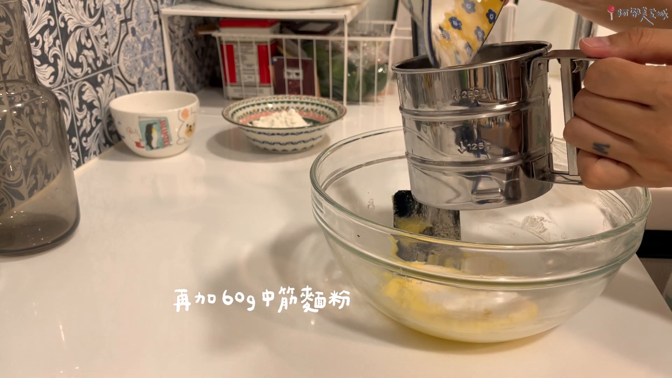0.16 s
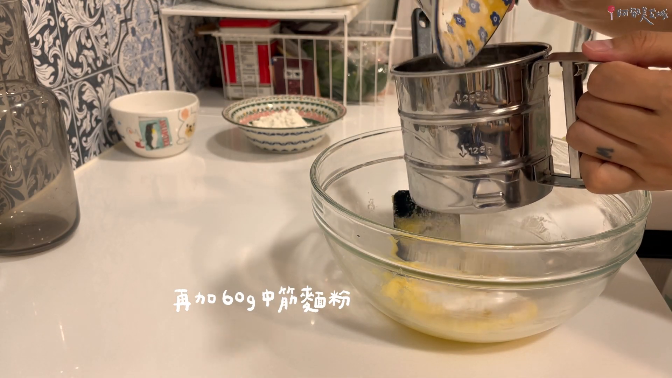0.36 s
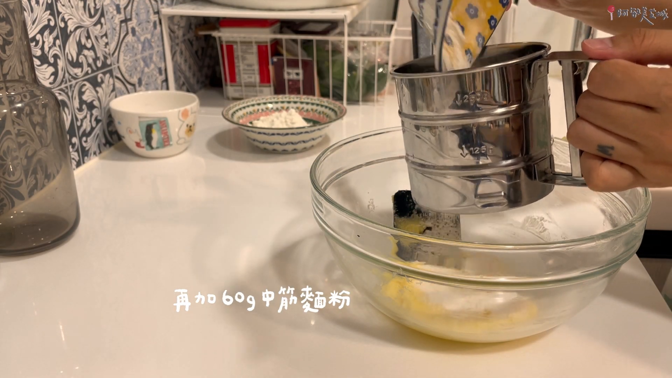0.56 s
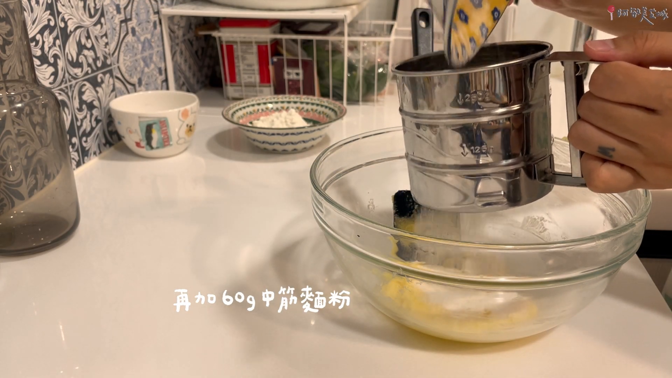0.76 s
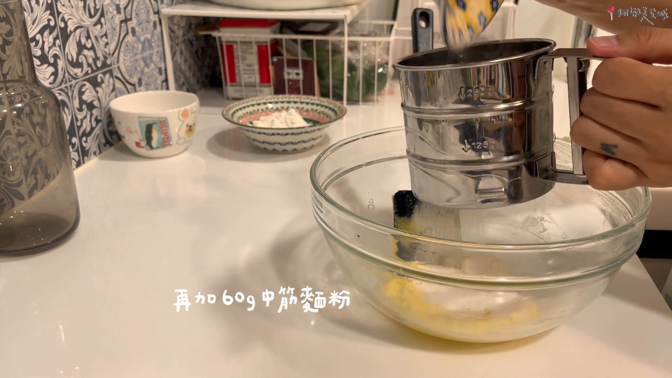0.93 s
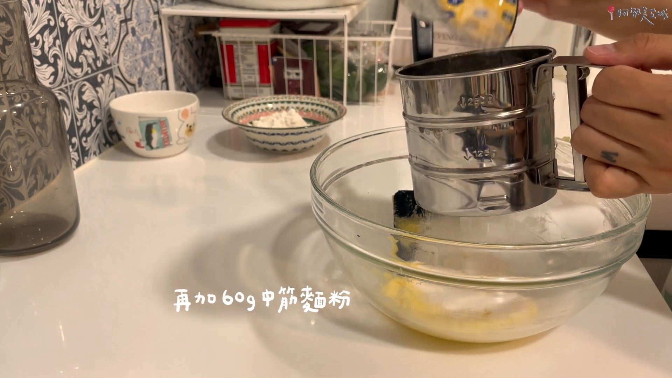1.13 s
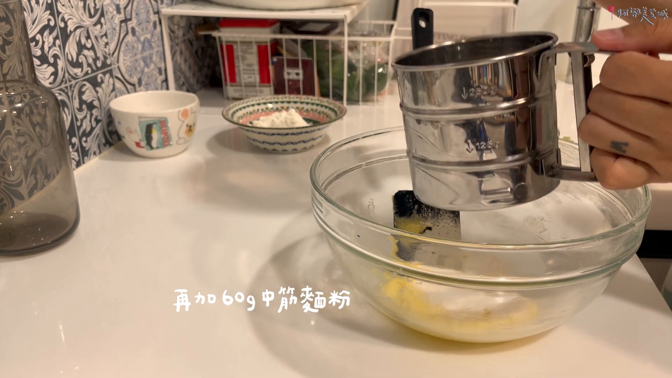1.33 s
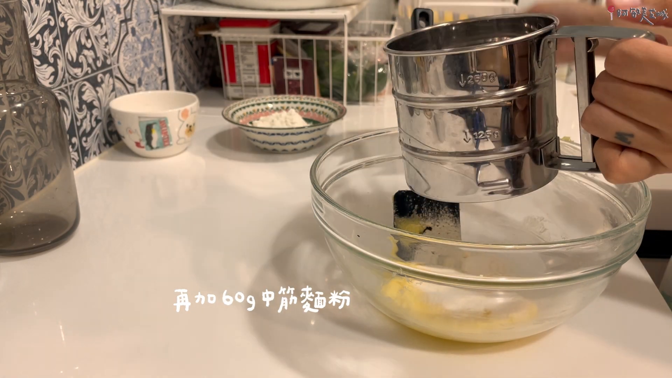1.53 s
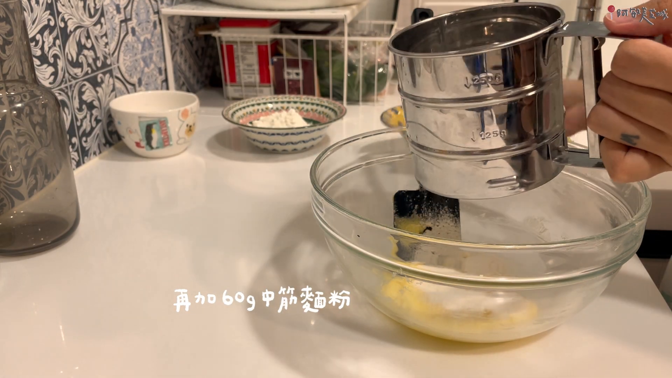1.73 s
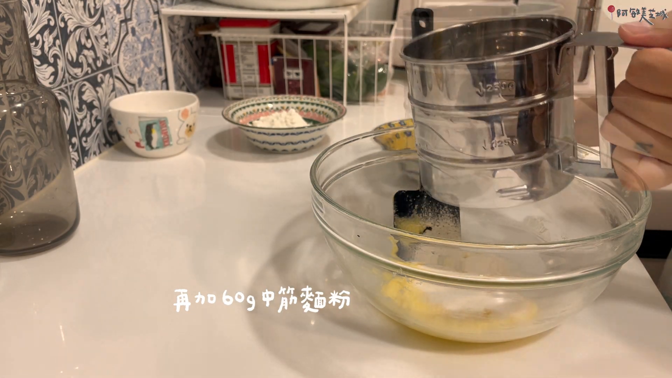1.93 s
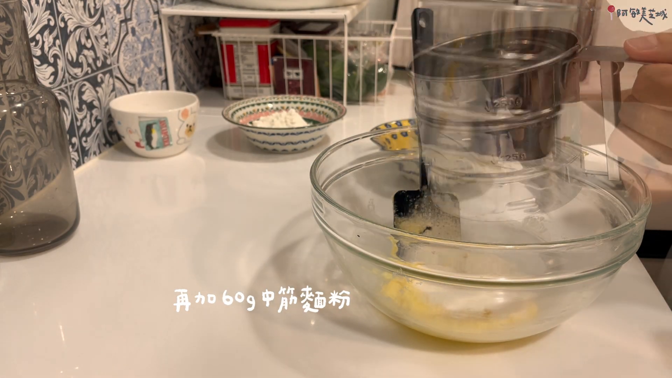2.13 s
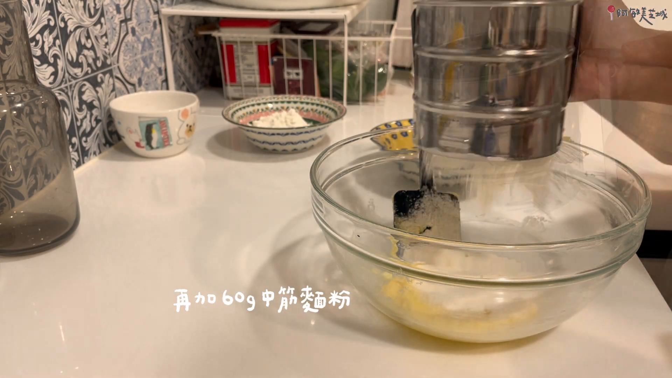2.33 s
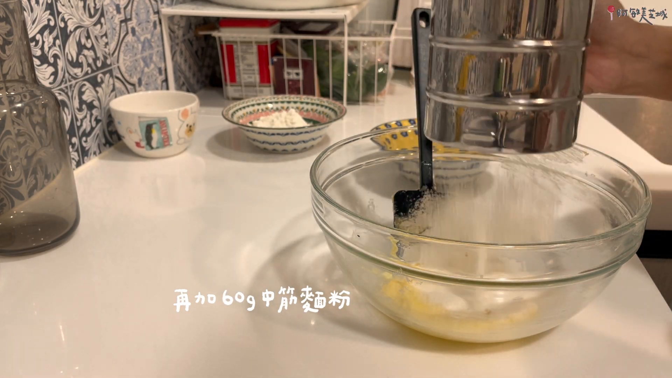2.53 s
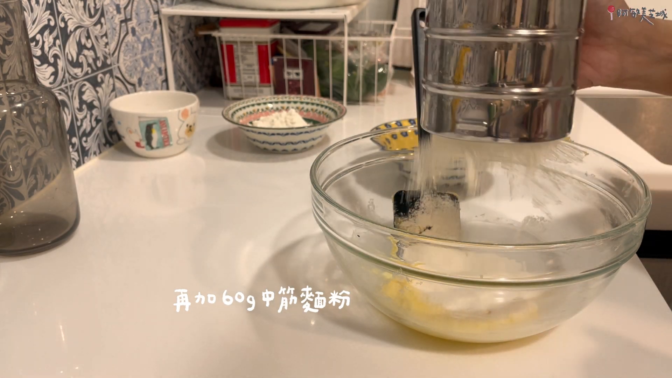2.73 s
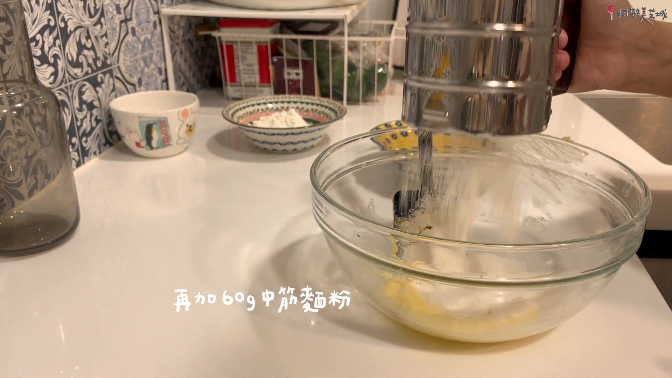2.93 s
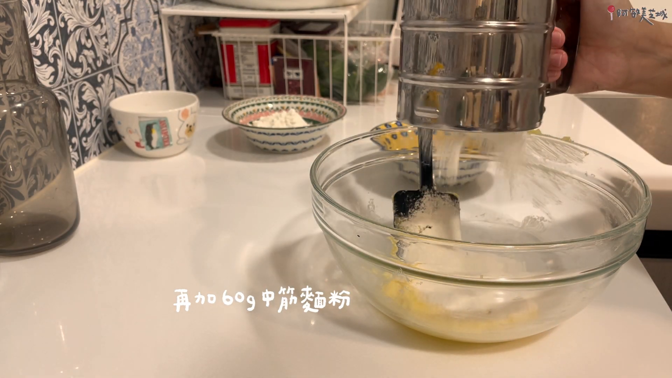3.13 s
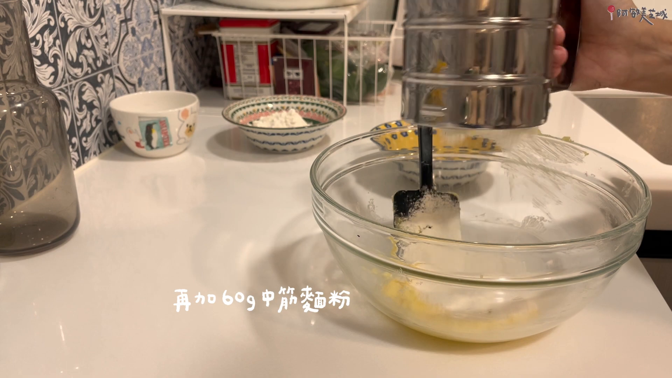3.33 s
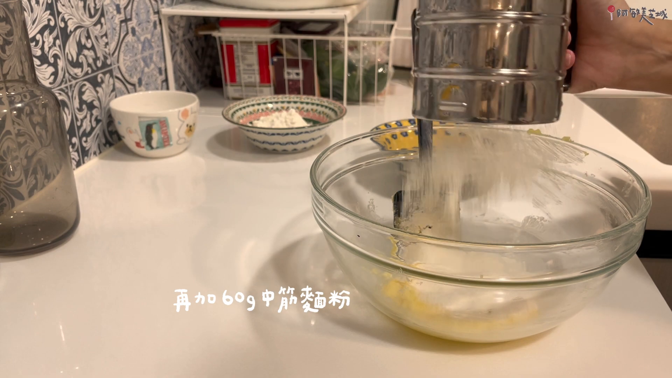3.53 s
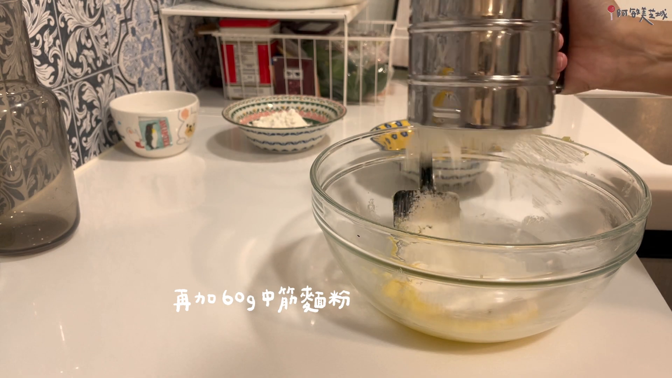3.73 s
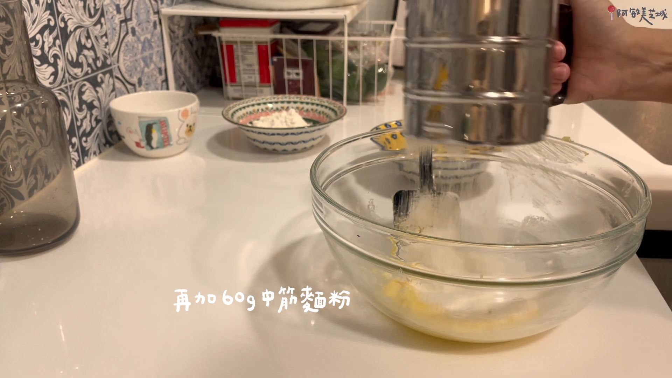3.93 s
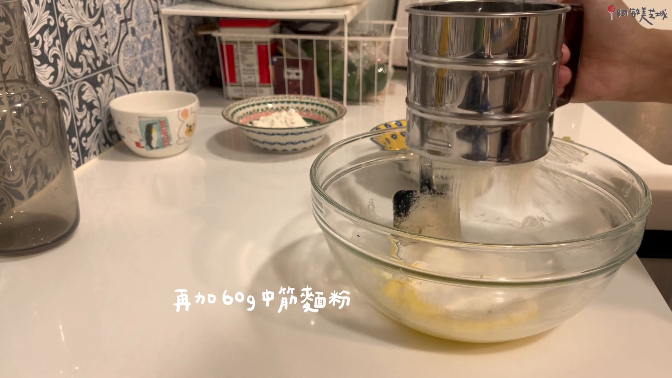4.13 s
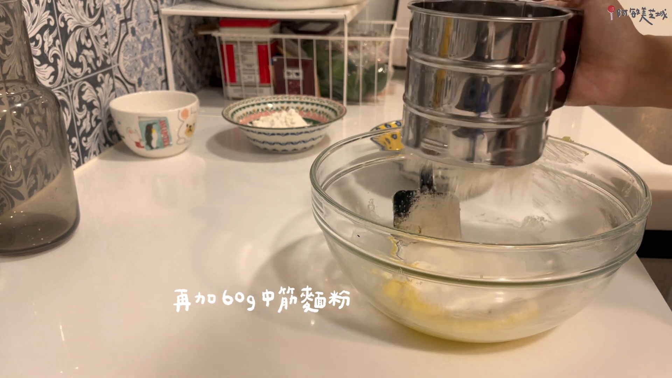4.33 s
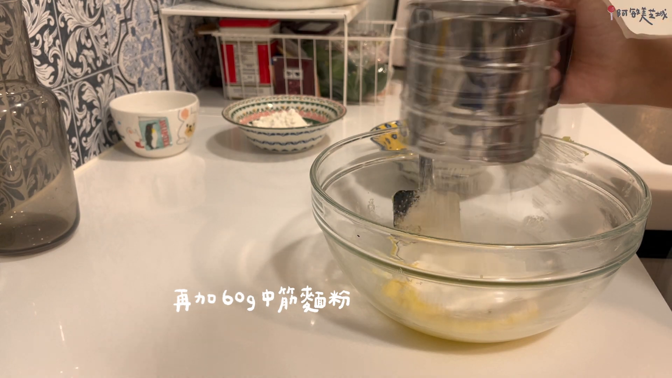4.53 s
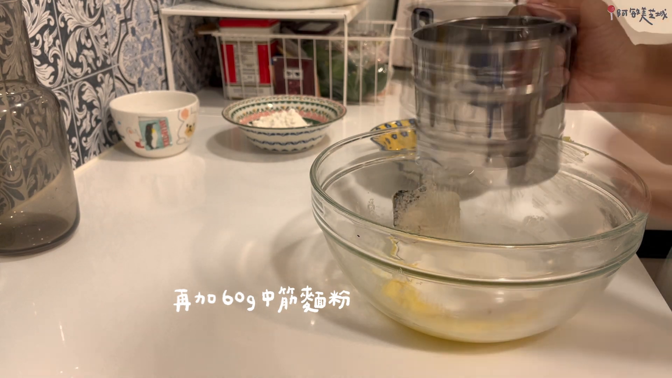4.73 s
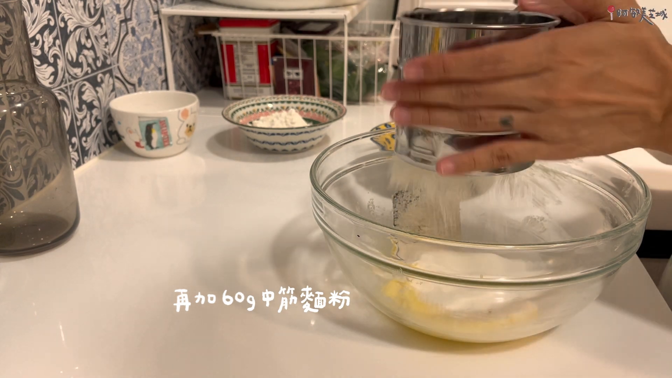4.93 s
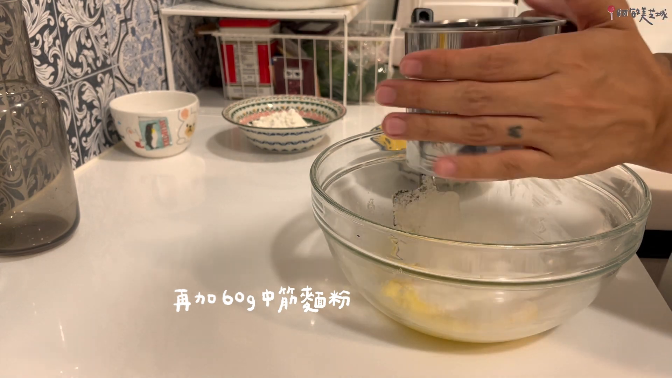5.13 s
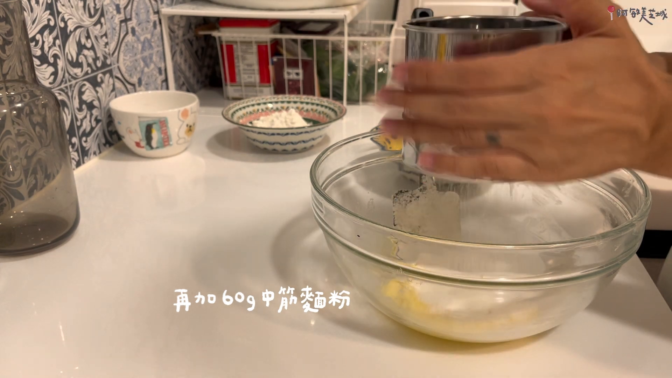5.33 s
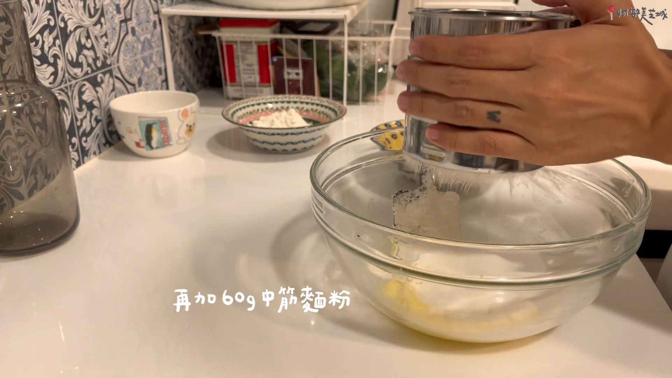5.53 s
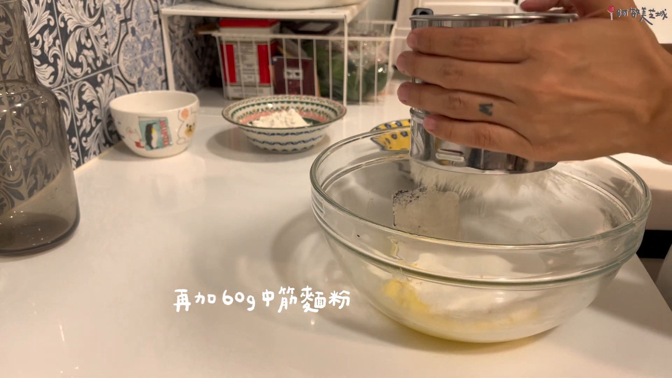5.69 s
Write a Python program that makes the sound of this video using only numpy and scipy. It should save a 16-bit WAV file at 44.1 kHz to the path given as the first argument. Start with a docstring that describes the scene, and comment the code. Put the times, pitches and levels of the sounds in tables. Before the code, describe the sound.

A small dish raps sharply on a steel flour sifter, the can knocks a glass bowl, then rhythmic squeezes rasp and palm slaps rattle it.

```python
"""A small ceramic dish taps the rim of a steel flour sifter: ringing modes, a noise crack and a dull thud.
The can knocks on a glass bowl; wires sweep the mesh as dense clicks that hiss and drive hollow notes;
thin steel ticks, flour trickles, and a palm slaps the can with a sinking thump and a rattle of wires.
Place: a hard-walled kitchen with broad noise and a low wavering hum. Distance: close.
Microphone: two ports, softly overloading on loud taps, with echoes made of decaying noise."""
import sys
import numpy as np
from scipy import signal
from scipy.fft import rfft, irfft, next_fast_len
from scipy.io import wavfile

SR = 44100
rng = np.random.default_rng(int(sys.argv[2]) if len(sys.argv) > 2 else 0)


def to_wav(s):
    """Save 16-bit WAV."""
    ch = np.atleast_2d(s).T  # columns
    pcm = np.round(np.clip(ch, -1, 1) * 32767)  # PCM
    wavfile.write(sys.argv[1], SR, pcm.astype(np.int16))


N = 254016
LEAD = 4410   # samples computed ahead of the start, so that earlier sound can ring into it
M = next_fast_len(N + LEAD)
TIME = (np.arange(M) - LEAD) / SR


def amp(db):
    """Decibels to a linear factor."""
    return 10 ** (np.asarray(db) / 20)


def rms_one(x):
    """Scales x to rms 1."""
    return x / np.sqrt(np.mean(x ** 2) + 1e-20)


def peak_one(x):
    """Scales x to peak 1."""
    return x / np.abs(x).max()


def at_hz(points, hz):
    """Reads a (Hz, value) curve along log frequency."""
    points = np.array(points)
    return np.interp(np.log(hz + 1), np.log(points[:, 0] + 1), points[:, 1])


def coloured(x, spectrum):
    """Gives white x a spectrum; rms 1."""
    hz = np.fft.rfftfreq(x.shape[-1], 1 / SR)
    return rms_one(irfft(rfft(x) * amp(at_hz(spectrum, hz)), x.shape[-1]))


def clicks(times, sizes):
    """Single-sample impulses at the given seconds."""
    out = np.full(M, 1e-18)   # a trace above zero keeps the filters fast
    np.add.at(out, np.round(np.asarray(times) * SR).astype(int) + LEAD, sizes)
    return out


def ring(x, hz, t60):
    """A damped resonance: a unit click sets a sine of height 1 ringing."""
    radius, w = amp(-60 / (t60 * SR)), 2 * np.pi * hz / SR
    return signal.lfilter([0, np.sin(w)], [1, -2 * radius * np.cos(w), radius ** 2], x)


def dying(times, levels_db, t60):
    """An envelope that jumps at each time and falls 60 dB in t60."""
    return signal.lfilter([1], [1, -amp(-60 / (t60 * SR))], clicks(times, amp(levels_db)))


def struck(times, levels_db, modes, spread_db):
    """Every blow strikes every mode with a random strength of its own."""
    draw = rng.standard_normal((len(times), len(modes)))
    total = 0
    for k, (hz, db, t60) in enumerate(modes):
        blows = clicks(times, amp(levels_db + db + spread_db * draw[:, k]))
        total = total + ring(blows, hz, t60)
    return total


def grit(per_s, spread_db):
    """Random clicks of uneven size and either sign; rms 1."""
    sizes = amp(spread_db * np.minimum(rng.exponential(1, M), 4)) * rng.choice([-1, 1], M)
    return rms_one(sizes * (rng.random(M) < per_s / SR))


def lumps(per_s, depth_db):
    """A gain that wanders between random levels, drawn at the given rate."""
    knots = rng.standard_normal(int(M / SR * 400))
    place = np.arange(M) / SR * min(per_s, 390)
    return amp(depth_db * np.interp(place, np.arange(len(knots)), knots))


# Dish on rim, close to the ports, one row a touch of a bouncing tap. Each row: start in seconds, level in dB,
# extra on the modes under 2.4 kHz in dB, extra on those from 4.5 kHz up in dB.
TAP_TOUCHES = [(-.045, -1, -9, -2), (0.132, -18, 8, 4), (0.2601, 3, 5, -1), (0.2644, -4, -2, 0),
               (0.271, -13.5, 2, -0.5), (0.3963, 0, 1.5, -4), (0.402, 1, -23, -4.5), (0.406, -4.5, 1.5, -1),
               (.541, -3, 9, -1), (.546, 1.5, -1.5, -1), (0.6896, -0.5, 9, -5.5), (.694, 0, -18, -1),
               (.866, 2, 3.5, -3.5), (0.869, -6, -5, -2.5), (.884, -20, 10, 2), (1.054, 3, -7, -1.5),
               (1.061, -10, 7, 7), (1.064, 1, -17.5, 4.5)]
# Dish and rim ringing together. Each row: frequency in Hz, relative level in dB, t60 in seconds.
DISH_MODES = [(622, -18.5, 0.055), (875, -19, 0.12), (1410, -22, 0.059), (1644, -15.5, 0.057),
              (2007, -6, 0.021), (2890, -4, 0.03), (2710, -21, 0.028), (2974, -2, 0.047), (3075, -7, .03),
              (3085, 5, 0.033), (3166, 5, 0.045), (3130, -8, 0.027), (3400, -14, 0.03), (3880, -20, .03),
              (4660, -8, 0.023), (4940, -13.5, .03), (5120, 2.5, 0.026), (5135, -30, .15), (5160, -26, .12),
              (5208, -24, .15), (5250, -18, .2), (5300, -28, .1), (5920, -12.5, 0.027), (6457, -9.5, 0.041),
              (7080, -19.5, 0.025), (7260, -10.5, 0.0062), (10050, -30, 0.071), (15700, -4.5, 0.024)]
# Colour of the crack. Each row: frequency in Hz, relative level in dB per Hz.
TAP_CRACK_COLOUR = [(60, -45), (300, -24), (800, -25.5), (1600, -4.5), (2400, -11), (3100, -2.5),
                    (4000, -10.5), (6500, -11.5), (10000, -15), (13000, -22.5), (15000, -16)]
# parts of a tap against its level, dB
TAP_CRACK_DB, TAP_RING_DB, TAP_TOP_DB, THUD_DB, THUD_HIGH_DB = -2.5, -13, -10.5, -29.5, -21
DISH_FLUTTER_DB = 2   # flour and grip keep shaking the ring


def taps():
    """Modes, a broad crack and a dull thud of the can; where the dish lands tips the balance of its modes."""
    s, level_db, low_db, top_db = np.transpose(TAP_TOUCHES)
    crack = coloured(rng.standard_normal(M), TAP_CRACK_COLOUR)
    crack = crack * dying(s, level_db + TAP_CRACK_DB, t60=0.022)
    thud = ring(clicks(s, amp(level_db + THUD_DB)), 150, 0.032)
    thud = thud + ring(clicks(s, amp(level_db + THUD_HIGH_DB)), 489, 0.031)
    low_modes = [m for m in DISH_MODES if m[0] < 2400]
    main_modes = [m for m in DISH_MODES if 2400 <= m[0] < 4500]
    top_modes = [m for m in DISH_MODES if m[0] >= 4500]
    low = struck(s, level_db + TAP_RING_DB + low_db, low_modes, spread_db=2.5)
    main = struck(s, level_db + TAP_RING_DB, main_modes, spread_db=2.0)
    top = struck(s, level_db + TAP_TOP_DB + top_db, top_modes, spread_db=2.5)
    return low + (main + top) * lumps(120, DISH_FLUTTER_DB) + crack + thud


# Can on glass bowl. Each row: start in seconds, level in dB, crisp edge in dB.
BOWL_KNOCKS = [(1.889, -3.5, -20), (1.918, -22, -22), (2.0286, -11.5, -11.5)]
# Glass bowl and can wall. Each row: frequency in Hz, relative level in dB, t60 in seconds.
BOWL_MODES = [(330, -10, .07), (470, -16, .04), (996, -19, .05), (1093, -15, .06), (1389, -6, .025),
              (1642, -4, .02), (1841, -8, .025), (2000, 8, .005), (2186, -6, .012), (2800, 1, .005),
              (2955, -8, .02), (3865, -10, .015), (5426, -29, .22), (5500, -33, .12)]
# Colour of the blunt contact. Each row: frequency in Hz, relative level in dB per Hz.
KNOCK_COLOUR = [(50, -54), (150, -14), (400, -12), (1000, -2.5), (2000, -0.5), (3500, -15), (6000, -31),
                (14000, -58)]
# Colour of the can juddering on the glass. Each row: frequency in Hz, relative level in dB per Hz.
SKID_COLOUR = [(100, -30), (300, -5), (550, 8), (1000, -12), (1600, 8.5), (2200, -10), (3000, -4),
               (4500, -25), (9000, -44), (14000, -52)]
KNOCK_CRACK_DB, KNOCK_RING_DB, SKID_DB = -2.5, -5.5, -22.5   # against the level of the knock
KNOCK_CRACK_T60_S, SKID_T60_S = 0.034, 0.37


def knocks():
    """Steel against thick glass: a blunt contact, dull, with thin long rings and a judder after it."""
    s, level_db, edge_db = np.transpose(BOWL_KNOCKS)
    edge = ring(clicks(s + 0.0008, amp(edge_db)), 2350, 0.007)
    crack = coloured(rng.standard_normal(M), KNOCK_COLOUR)
    crack = crack * dying(s + 0.00096, level_db + KNOCK_CRACK_DB, KNOCK_CRACK_T60_S)
    rings = struck(s + .0006, level_db + KNOCK_RING_DB, BOWL_MODES, spread_db=2.0)
    swell = np.minimum(1, 1.02 - dying(s + .0006, 0 * s, t60=.0025))   # the blow takes a moment to build
    skid = coloured(grit(1500, spread_db=2.0), SKID_COLOUR)
    skid = skid * dying(s + 0.0029, level_db + SKID_DB, SKID_T60_S)
    return rings * swell + crack + skid + edge


# Wires sweeping the mesh, hard as the trigger is squeezed, softer as it is let go. Each row: start in seconds,
# level in dB, swell in seconds, length in seconds, air in the can in Hz, its level in dB, wall note in dB.
SWEEPS = [(2.098, -23.5, 0.036, 0.028, 800, -51, -32), (2.267, -37, 0.024, 0.054, 600, -32.5, -27.5),
          (2.394, -25, 0.012, 0.041, 749, -24.5, -50), (2.544, -33.5, 0.028, 0.05, 635, -29.5, -29),
          (2.6563, -28.5, .01, 0.053, 778, -23, -48), (2.808, -33, 0.02, 0.043, 652, -33, -37),
          (2.921, -28, 0.0062, 0.03, 787.5, -17.5, -55), (3.065, -35.5, 0.015, 0.019, 921, -30.5, -50),
          (3.173, -18, 0.0068, 0.0046, 850, -37, -19.5), (3.305, -35.5, 0.019, 0.05, 785, -32, -33.5),
          (3.4205, -22.5, 0.01, 0.028, 792, -19.5, -26.5), (3.564, -32.5, 0.015, 0.029, 650, -30.5, -46),
          (3.678, -24, 0.0094, 0.027, 786, -24, -34), (3.811, -31, 0.009, 0.028, 672, -30.5, -33),
          (3.915, -21.5, 0.0066, 0.023, 807, -20, -39), (4.062, -31.5, 0.0091, 0.027, 697, -28, -29),
          (4.149, -15, 0.014, 0.0093, 848, -19, -16), (4.278, -27.5, 0.0094, 0.027, 838, -22.5, -26),
          (4.373, -16, 0.013, 0.015, 900, -39, -26), (4.493, -32, 0.016, 0.042, 753, -42, -28.5),
          (4.573, -30, 0.017, 0.019, 573, -42, -44), (4.871, -40, 0.012, 0.031, 756, -41, -51)]
# Colour of wires or flour on the mesh. Each row: frequency in Hz, relative level in dB per Hz.
MESH_COLOUR = [(150, -56.5), (400, -18), (650, -9), (1000, -6.5), (1400, -7), (2500, -8), (3400, -4),
               (3700, -9.5), (4400, -10), (5600, -15.5), (6600, -16.5), (8000, -15), (11000, -19),
               (15500, -30.5)]
# Steel can under the wires. Each row: frequency in Hz, level in dB, t60 in seconds.
CAN_MODES = [(802, -45.5, 0.28), (867, -46, 0.12), (1150, -41, 0.032), (1804, -38, 0.042),
             (2510, -46, 0.0092), (3270, -65, .02), (3400, -61.5, 0.016), (3810, -69, 0.023),
             (4490, -46, 0.037), (5020, -53, 0.029)]
STROKE_T60_S, STROKE_SAG_DB_PER_S = 0.1, 82   # fall after the length; sag added after the swell
SWELL_DB, CATCH_S = 12.5, 0.0025   # a stroke catches, then swells this much
NOTE_ROUGH_DB = -20   # wire clicks driving the notes, against the shove of the stroke
NOTE_LAG_S, NOTE_SWELL_S = 0.00804, 0.0078   # the hollow notes build a little after the hiss
WALL_HZ, WALL_T60_S, AIR_T60_S = 1003, .065, .1
NOTE_FLUTTER_DB = 3   # flour, wires and grip keep shaking the rings


def strokes():
    """Dense wire clicks under each stroke hiss on the mesh; the shove rings the can wall and the air inside it."""
    wires = grit(5000, spread_db=3.5) * lumps(170, depth_db=4.0)   # the wires catch in clumps
    push, notes, lag = np.full(M, 1e-18), np.zeros(M), round(NOTE_LAG_S * SR)
    for s, level_db, swell, length, air_hz, air_db, wall_db in SWEEPS:
        part = slice(round(s * SR) + LEAD, round((s + .3) * SR) + LEAD)
        t = TIME[part] - TIME[part.start]
        fall_db = -60 * np.clip(t - length, 0, 1) / STROKE_T60_S
        fall_db = fall_db - STROKE_SAG_DB_PER_S * np.clip(t - swell, 0, 1)
        rise_db = -SWELL_DB * np.clip(1 - t / max(swell, .001), 0, 1)
        shape = np.clip(t / CATCH_S, 0, 1) * amp(fall_db + rise_db)
        push[part] += amp(level_db) * shape
        shove = (t == 0) + amp(NOTE_ROUGH_DB) * wires[part] * shape + 1e-18
        air_note = amp(air_db) * peak_one(ring(shove, air_hz, AIR_T60_S))
        wall_note = amp(wall_db) * peak_one(ring(shove, WALL_HZ, WALL_T60_S))
        late = slice(part.start + lag, part.stop + lag)
        notes[late] += (air_note + wall_note) * np.clip(t / NOTE_SWELL_S, 0, 1)
    wall = 0
    for k, (hz, db, t60) in enumerate(CAN_MODES):
        drive = wires * push * lumps(11, depth_db=9.5)
        wall = wall + (-1) ** k * amp(db) * ring(drive, hz, t60)
    hiss = coloured(wires, MESH_COLOUR) * push + wall
    return hiss, notes * lumps(70, NOTE_FLUTTER_DB)


# Trigger spring and wires ticking, the clearest. Each row: start in seconds, bright part in dB, lower part in dB.
CLEAR_TICKS = [(2.0835, -58, -55), (2.142, -33, -33), (2.379, -50, -40), (2.648, -52, -37),
               (2.899, -55, -43), (3.4025, -56, -42), (3.5508, -33, -41), (3.6614, -53, -50),
               (3.898, -52, -44), (4.1356, -54, -44), (4.358, -49, -35), (5.4837, -40, -49),
               (2.258, -38, -58), (2.537, -35, -41), (2.9655, -37, -29), (3.043, -32, -55),
               (3.1471, -29, -40), (3.2938, -32.5, -38), (4.2587, -29, -50), (4.471, -25, -52),
               (4.66, -31, -61), (4.696, -32.5, -67), (4.783, -32.5, -42.5), (4.9797, -34, -63),
               (5.103, -29.5, -42), (5.165, -50, -36.5), (5.309, -35, -39.5), (5.4086, -34.5, -61)]
# the rest fall at random from this second on; each part is 0 to 10 dB above its floor
FAINT_TICKS, HANDLED_FROM_S, FAINT_BRIGHT_DB, FAINT_LOW_DB = 10, 1.7, -47, -53.5


def ticks():
    """Short bright contacts of thin steel: two dying bands of noise."""
    when, bright, dull = rng.random((FAINT_TICKS, 3)).T
    faint_s = HANDLED_FROM_S + when * (N / SR - HANDLED_FROM_S)
    faint = [faint_s, FAINT_BRIGHT_DB + 10 * bright, FAINT_LOW_DB + 10 * dull]
    s, high_db, low_db = np.hstack([np.transpose(CLEAR_TICKS), faint])
    high_pass = signal.butter(2, 7000, "high", fs=SR, output="sos")
    low_band = signal.butter(2, [1800, 6500], "band", fs=SR, output="sos")
    high = rms_one(signal.sosfilt(high_pass, rng.standard_normal(M)))
    low = rms_one(signal.sosfilt(low_band, rng.standard_normal(M)))
    return high * dying(s, high_db, t60=0.016) + low * dying(s, low_db, t60=0.027)


# Palm on the can. Each row: start in seconds, level in dB, thump in dB, thump in Hz, wall note in Hz,
# contact in seconds, cupped air in dB.
PALM_SLAPS = [(4.862, -28, -27, 161.6, 3970, 0.0069, -30), (5.034, -23.5, -32.5, 109.4, 5390, 0.006, -33),
              (5.1818, -19.5, -18.5, 97, 2620, 0.0042, -15.5),
              (5.346, -25.5, -26, 100.1, 2510, 0.0077, -22), (5.504, -20.5, -21, 110.4, 2830, 0.005, -21),
              (5.642, -29.5, -35, 129.8, 2990, 0.013, -25)]
# Colour of the jolted wires. Each row: frequency in Hz, relative level in dB per Hz.
SLAP_COLOUR = [(50, -26), (150, 8), (300, -8.5), (600, -9), (1200, -16), (2600, -5.5), (4000, -7),
               (7000, -11.5), (11000, -13.5), (15500, -27)]
# Air cupped under the palm. Each row: frequency in Hz, relative level in dB, t60 in seconds.
CUPPED_AIR = [(294.7, -2, 0.026), (458, -5, 0.022), (630, -15, 0.014)]
WALL_NOTE_DB, RATTLE_DB = -27, -30   # against the level of the slap
THUMP_LAG_S, THUMP_T60_S = 0.001895, 0.065   # the palm's thump trails its contact
# its pitch starts raised by this multiple of itself and sinks as the palm flattens
THUMP_RAISE, THUMP_SINK_S = 4.16, 0.0035


def slaps():
    """A soft thump, cupped air, a short note of the damped wall, a jolt of the loose wires, then their rattle."""
    wires, push, body = grit(6000, spread_db=1.5), np.zeros(M), np.zeros(M)
    for s, level_db, thump_db, thump_hz, note_hz, contact, cup_db in PALM_SLAPS:
        since = TIME - s
        jolt = np.clip(since / 0.0044, 0, 1) * amp(-60 * np.clip(since - contact, 0, 1) / 0.013)
        rattle = dying([s + 0.015], [level_db + RATTLE_DB], t60=0.44)
        push += amp(level_db) * jolt + rattle
        late = np.clip(since - THUMP_LAG_S, 0, .3)
        sunk = THUMP_RAISE * THUMP_SINK_S * (1 - np.exp(-late / THUMP_SINK_S))
        thump = np.sin(2 * np.pi * thump_hz * (late + sunk)) * (late < .3)
        body += amp(thump_db - 60 * late / THUMP_T60_S) * thump
        body += struck([s + 0.00295], cup_db, CUPPED_AIR, spread_db=-0.5)
        body += amp(level_db + WALL_NOTE_DB) * ring(wires * jolt + 1e-18, note_hz, .007)
    return body + coloured(wires, SLAP_COLOUR) * push


# Flour trickling through the mesh. Each row: time in seconds, level in dB.
FLOUR_FLOW = [(1.9, -56), (1.94, -42), (2.06, -52.5), (3.3, -51), (4.45, -48), (4.68, -66), (5.04, -58),
              (5.76, -83)]


def trickle():
    """A thin hiss of dense random clicks while flour runs."""
    s, db = np.transpose(FLOUR_FLOW)
    level = amp(np.interp(TIME, s, db, left=-120))
    return level * coloured(grit(11000, spread_db=-1.0), MESH_COLOUR)


def alike_pair(likeness, size):
    """Spectra of two white noises with the given likeness."""
    hz = np.fft.rfftfreq(size, 1 / SR)
    mid, side = rfft(rng.standard_normal((2, size)))
    c = np.clip(at_hz(likeness, hz), 0, .99)
    return np.sqrt(1 + c) * mid + np.sqrt(1 - c) * side * [[1], [-1]]


# Likeness of the echoes at the two ports. Each row: frequency in Hz, likeness as a share.
ECHO_LIKENESS = [(150, 0.83), (700, 0.1), (1500, 0.067), (3000, 0.27), (6000, 0.54), (9000, 1),
                 (13000, 0.084)]
# Counter, tiles and bowl close by. Each row: frequency in Hz, relative level in dB.
CLOSE_SURFACES = [(100, -2.5), (200, -6), (400, 6), (800, 6), (1600, 4), (3200, 9), (6400, 3), (12800, 15)]
# Colour of the kitchen's tail. Each row: frequency in Hz, relative level in dB.
TAIL_COLOUR = [(100, -2), (200, 3), (400, -10), (800, 9), (1600, -4), (3200, -7), (6400, -2.5), (12800, -4)]
# Decay of the kitchen's tail. Each row: frequency in Hz, t60 in seconds.
TAIL_T60 = [(150, 0.28), (600, 0.2), (2000, 0.78), (5000, 0.67), (12000, 0.44)]
ROOM_DB = -3.5   # energy of the echo pattern


def kitchen():
    """Echo pattern at the two ports: a short burst from surfaces close by, then a tail that dies band by band."""
    size = SR   # one second
    noise, hz = alike_pair(ECHO_LIKENESS, size), np.fft.rfftfreq(size, 1 / SR)
    t, echo = np.arange(size) / SR, 0
    for centre in 100 * 2. ** np.arange(8):   # octave bands, Hz
        share = np.clip(1 - np.abs(np.log2((hz + 1) / centre)), 0, 1)
        early = amp(at_hz(CLOSE_SURFACES, centre) - 60 * t / 0.053)
        tail = amp(at_hz(TAIL_COLOUR, centre) - 60 * t / at_hz(TAIL_T60, centre))
        echo = echo + irfft(noise * share, size) * (early + tail)
    echo = echo * np.clip(t / 0.0025, 0, 1)
    return amp(ROOM_DB) * echo / np.sqrt(np.sum(echo ** 2) / 2)


def ports(near, echo, gaps, pan_db):
    """Direct sound plus echoes; the ports hear the treble with a phase gap that grows with pitch."""
    direct = near * amp([[pan_db / 2], [-pan_db / 2]])
    pair = direct + signal.fftconvolve(near[None], echo, axes=1)[:, :M]
    gap = at_hz(gaps, np.fft.rfftfreq(M, 1 / SR))
    return irfft(rfft(pair) * np.exp(1j * gap * [[0], [-1]]), M)


# The low hum. Each row: time in seconds, pitch in Hz, level of its fundamental in dB rms before it wavers.
HUM_COURSE = [(0, 68.1, -50), (.6, 69.1, -59), (.9, 68.8, -42.5), (1.861, 70.05, -40.5),
              (2.15, 69.1, -46.5), (2.35, 65.4, -46.5), (2.7, 65.65, -41.5), (3.4, 65.4, -44),
              (3.8, 64, -51), (3.95, 69.6, -43.5), (4.44, 65, -49.5), (5.76, 64.5, -46)]
# Kitchen background. Each row: frequency in Hz, relative level in dB per Hz.
AIR_COLOUR = [(15, -62.5), (25, -50), (50, -8), (74, -8.5), (98, -13.5), (178, -11.5), (269, -23),
              (314, -14), (451, -22), (555, -21), (1870, -25), (12000, -67.5), (15600, -114), (22000, -120)]
# Its likeness at the two ports. Each row: frequency in Hz, left-right likeness.
AIR_PAIR_LIKENESS = [(60, 0.97), (180, 0.86), (550, 0.15), (1650, 0.27), (4970, 0.42), (15000, 0.057)]
AIR_DB = -43.5   # rms


def background():
    """Broad room noise and a low hum that wavers, with a weak octave."""
    s, hz, db = np.transpose(HUM_COURSE)
    turn = 2 * np.pi * np.cumsum(np.interp(TIME, s, hz)) / SR
    level = np.sqrt(2) * amp(np.interp(TIME, s, db)) * lumps(21, depth_db=0.5)
    hum = level * (np.sin(turn) + amp(-11.0) * np.sin(2 * turn))
    air = coloured(irfft(alike_pair(AIR_PAIR_LIKENESS, M), M), AIR_COLOUR)
    return amp(AIR_DB) * air + hum


# Phase gap between the ports for the dish above the rim. Each row: frequency in Hz, left's lead in radians.
DISH_PHASE_GAP = [(0, 0), (7000, -.3), (8100, -3.1), (10000, -3.3), (11300, -4.8), (11900, -6.2),
                  (14100, -6.5), (15400, -8)]
# The same for the can. Each row: frequency in Hz, left's lead in radians.
CAN_PHASE_GAP = [(0, 0), (6100, 0), (6800, -1), (7500, -3.1), (9500, -3.4), (10300, -4.4), (11300, -6.1),
                 (13700, -6.4), (14500, -8.6), (15400, -9.4)]
NOTE_ROOM_DB = -8   # the hollow notes reach the walls less than the hiss
SWAY_PER_S = 2.3   # the can moves in the hand and meets other echoes


def scene():
    """Sets every source before the two ports in the kitchen; the can sways between two echo patterns."""
    echo, other = kitchen(), kitchen()
    hiss, notes = strokes()
    can = hiss + ticks() + trickle() + slaps()
    sway = np.pi * SWAY_PER_S * TIME
    heard = ports(taps(), echo, DISH_PHASE_GAP, pan_db=3.5)
    heard = heard + ports(can * np.abs(np.cos(sway)), echo, CAN_PHASE_GAP, pan_db=1.4)
    heard = heard + ports(can * np.abs(np.sin(sway)), other, CAN_PHASE_GAP, pan_db=1.5)
    heard = heard + ports(notes, amp(NOTE_ROOM_DB) * other, CAN_PHASE_GAP, pan_db=-3.5)
    heard = heard + ports(knocks(), other, CAN_PHASE_GAP, pan_db=3.3)
    return (heard + background())[:, LEAD:LEAD + N]


def record(dry):
    """Loud taps hit a soft ceiling; rumble and the top are cut."""
    held = dry / (1 + np.abs(dry / .95) ** 6) ** (1 / 6)
    rumble_cut = signal.butter(4, 33, "high", fs=SR, output="sos")
    top_cut = signal.ellip(10, .5, 60, 15700, fs=SR, output="sos")
    held = signal.sosfilt(rumble_cut, held)
    return np.clip(signal.sosfilt(top_cut, held), -1, 1)


dry = scene()
out = record(dry)
to_wav(out)
```